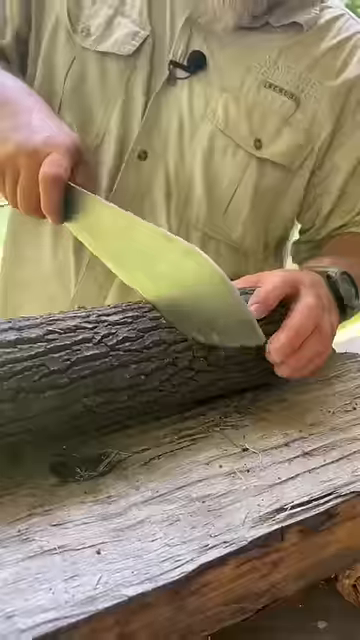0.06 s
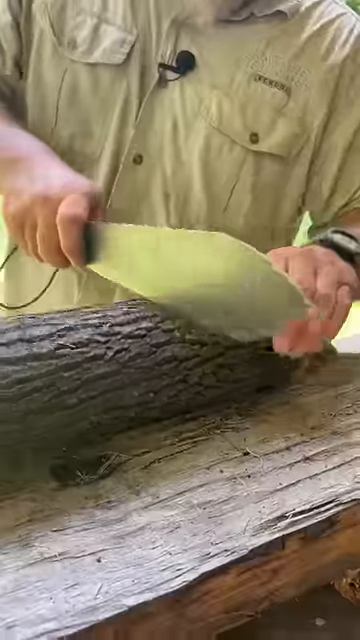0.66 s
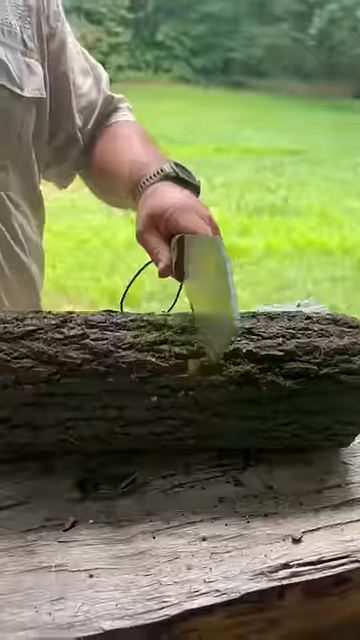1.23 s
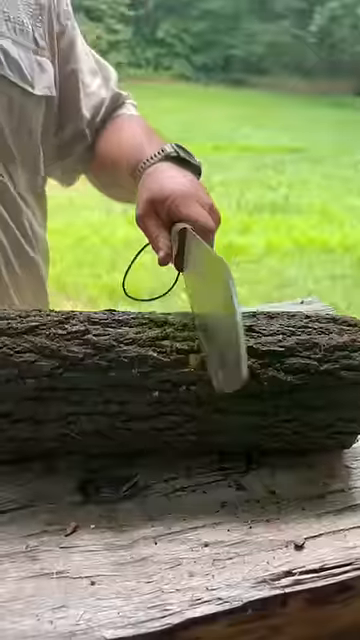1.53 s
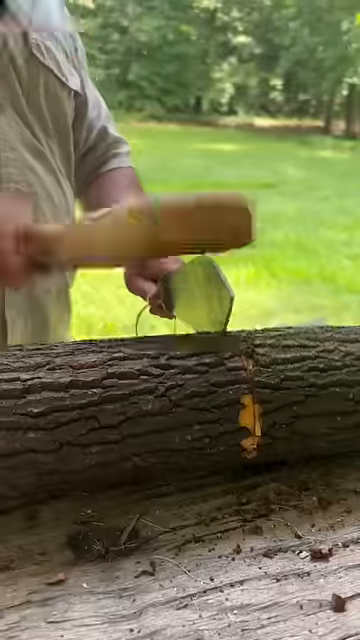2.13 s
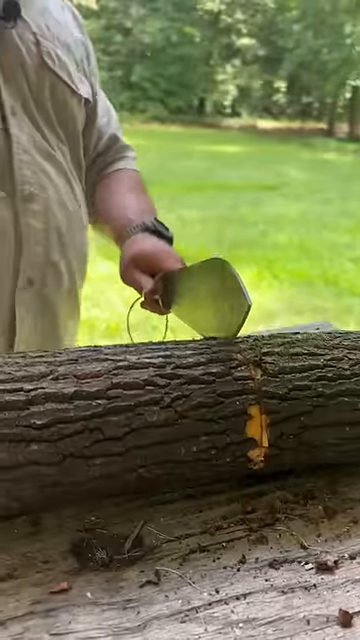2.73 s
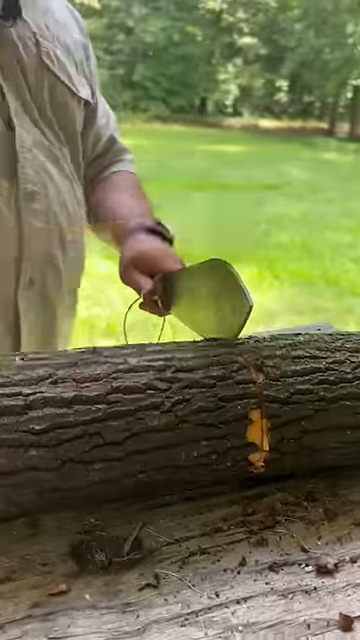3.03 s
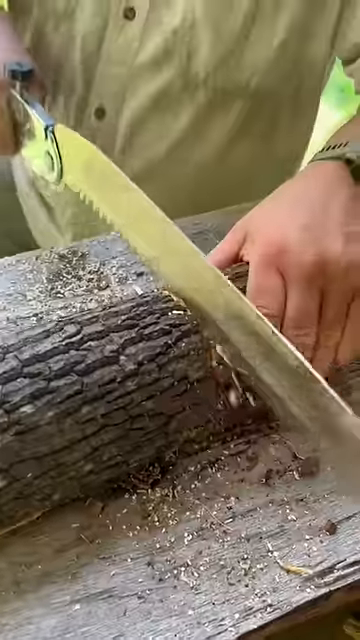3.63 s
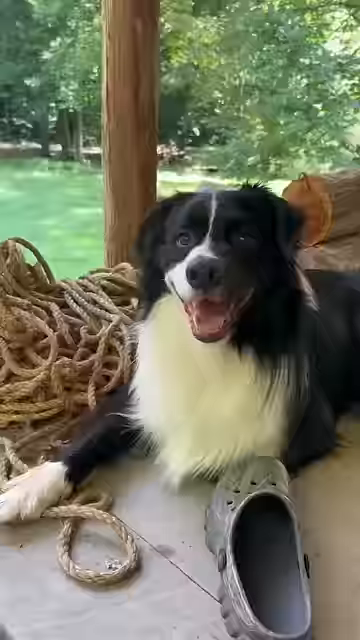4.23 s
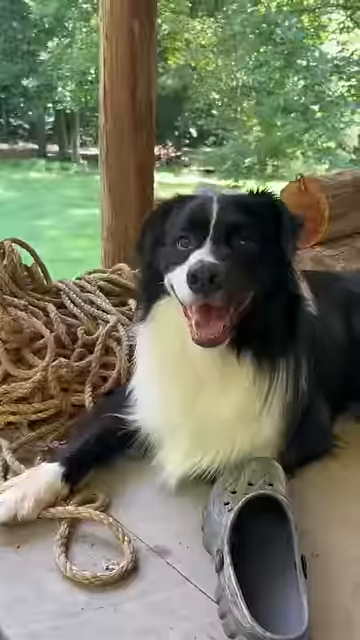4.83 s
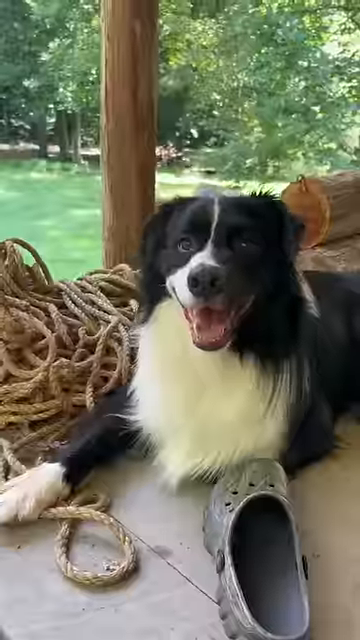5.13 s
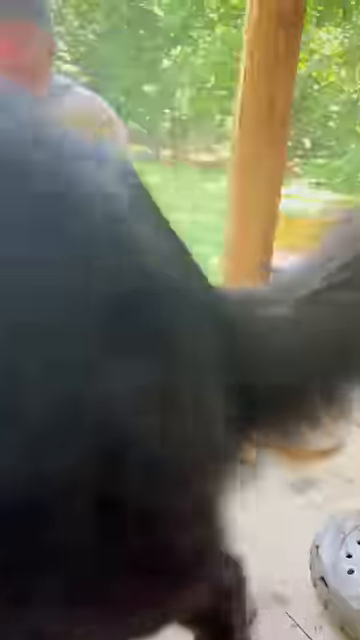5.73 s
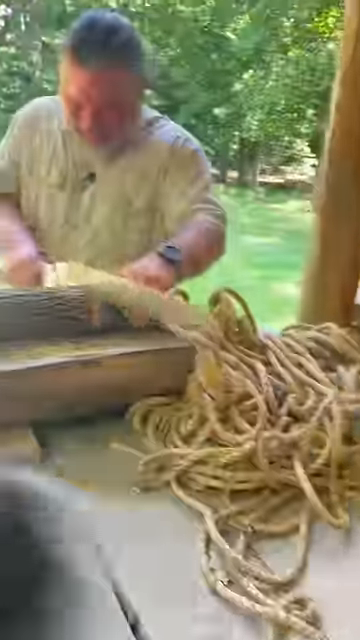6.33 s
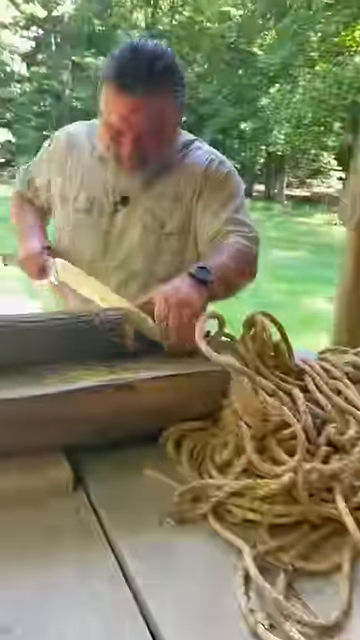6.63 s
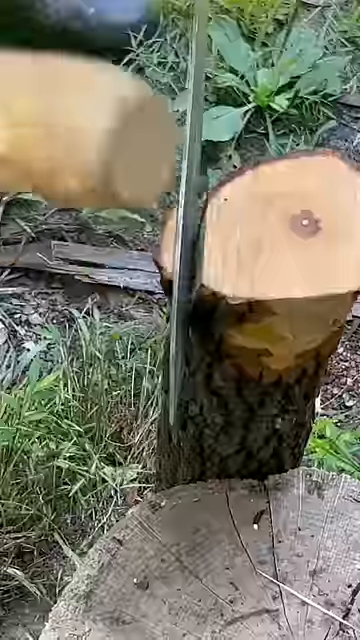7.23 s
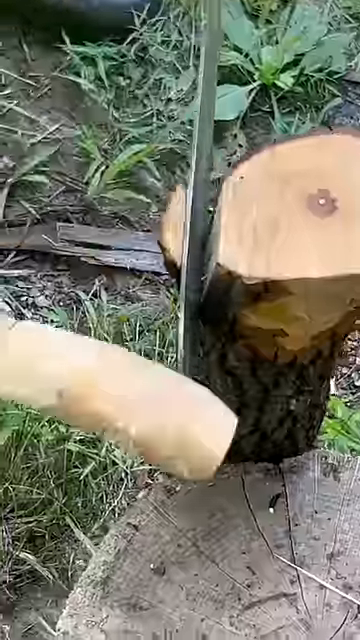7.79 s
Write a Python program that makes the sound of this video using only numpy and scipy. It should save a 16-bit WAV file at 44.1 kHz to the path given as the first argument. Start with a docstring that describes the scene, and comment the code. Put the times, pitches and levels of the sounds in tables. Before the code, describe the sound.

Quiet outdoor air with a very faint insect shrill lies under everything. In the first second a knife edge whispers lightly over bark and the log rocks with soft, dull bumps. From 1.4 to 3.2 seconds a wooden baton strikes the blade six times, about three a second, growing louder: sharp cracks with a brief steel ring, a low bench thump and a short echo. The loudest slightly overload the close microphone. From 3.2 seconds a toothed blade saws the log in much quieter, uneven rasping strokes with small squeaks and occasional dull knocks. The sawing eases around 5 seconds, then grows stronger from 5.5, the teeth catching and chattering near 6, 6.5 and 7 seconds while the bench rumbles. It cuts off at 7.2 seconds. Two more loud, drier baton blows crack against the blade at 7.4 and 7.8 seconds.

```python
"""Knife work on a log, on a wooden porch bench by a lawn. Over quiet air and faint insects, the edge
whispers across the bark and the log rocks. From 1.4 s a wooden baton drives the blade in with six knocks.
From 3.2 s the toothed spine saws across the log, catching and chattering. At 7.4 s come two last blows,
splitting an upright log out on the ground. The loudest blows overload the close microphone."""
import sys
import numpy as np
from scipy import signal
from scipy.fft import rfft, irfft, next_fast_len
from scipy.io import wavfile
from scipy.ndimage import map_coordinates

SR = 44100
rng = np.random.default_rng(int(sys.argv[2]) if len(sys.argv) > 2 else 0)


def output_pcm(signal):
    """Save a mono or channel-first signal as 16-bit PCM at the path in sys.argv[1].

    Samples are clipped to [-1, 1] before scaling.
    """
    pcm = np.clip(np.atleast_2d(signal).T, -1, 1) * 32767
    wavfile.write(sys.argv[1], SR, np.round(pcm).astype(np.int16))


N = 355446
TIME = np.arange(N) / SR
RING = TIME[:SR]  # one second for a hit to ring out


def undb(db):
    """Decibels to gain."""
    return 10 ** (np.asarray(db) / 20)


def unit(x):
    """Scale to rms 1."""
    return x / np.sqrt(np.mean(x ** 2))


def fade(t60):
    """One second of exponential decay."""
    return np.exp(-np.log(1000) * RING / t60)


def add(out, s, x):
    """Mix x in at time s."""
    i = int(s * SR)
    out[i:i + len(x)] += x[:len(out) - i]


def colour(x, curve, peaks=()):
    """EQ x with a smooth curve and resonant peaks on top; rms 1."""
    size = next_fast_len(len(x))
    hz = np.arange(size // 2 + 1) * SR / size
    curve_hz, curve_db = np.transpose(curve)
    db = np.interp(np.log(hz + 1), np.log(curve_hz), curve_db)
    for centre, width, lift in peaks:
        db = db + lift / (1 + (2 * (hz - centre) / width) ** 2)
    return unit(irfft(rfft(x, size) * undb(db), size)[:len(x)])


def noise(curve, size=SR):
    """Coloured noise of rms 1."""
    return colour(rng.standard_normal(size), curve)


def grains(rate, spread_db=2):
    """Random clicks of uneven size."""
    clicks = (rng.random(N) < rate / SR) * rng.standard_normal(N)
    return clicks * undb(spread_db * rng.standard_normal(N))


def walk(rate):
    """Slow random modulation of rms 1."""
    knots = np.arange(0, N / SR + 1, 1 / rate)
    return unit(np.interp(TIME, knots, rng.standard_normal(len(knots))))


def swing(start, length, fastest):
    """One hand stroke: its samples and its speed, from rest up to 1 and back."""
    now = slice(int(start * SR), int((start + length) * SR))
    turn = np.interp(TIME[now], [start, start + length * fastest, start + length], [0, .5, 1])
    return now, np.sin(np.pi * turn)


# EQ of the outdoor bed: f/Hz, level/dB
AIR_EQ = [(15, -41.5), (25, -4), (153, -12.5), (190, -11), (335, -15.5), (988, -20.5), (1070, -17),
          (1190, -21), (1890, -24.5), (5730, -33.5), (8140, -38.5), (16000, -41.5)]

def air():
    """A quiet bed of outdoor air, gently wavering."""
    return undb(-65.5 + 1.1 * walk(5)) * noise(AIR_EQ, size=N)


def insects(hz=8250):
    """A faint, narrow shrill from the trees."""
    return undb(-87 + 1.5 * walk(6)) * noise([(hz * .85, -50), (hz, 0), (hz * 1.15, -50)], size=N)


# EQ of steel on bark: f/Hz, level/dB
BARK_EQ = [(1470, -39), (2500, -9), (3300, -16), (4050, -1.5), (4580, -10), (5970, -6), (8870, -17),
           (13000, -19), (16000, -24)]
# EQ of a sharp attack, for knife ticks and baton cracks: f/Hz, level/dB
CRACK_EQ = [(60, -2), (400, -2), (1500, 0), (2800, 1), (3800, -14), (6000, -10.5), (10000, -18.5),
            (16000, -32)]
# light passes of the edge: t/s, length/s, fastest point/share of length, level/dB
EDGE_SLIDES = [(0.158, .29, 0.79, -62.5), (0.533, 0.3, 0.87, -66), (.94, 0.17, 0.84, -70)]
# ticks of the edge on a bark ridge and of the knife being handled: t/s, level/dB
KNIFE_TICKS = [(.415, -51.5), (1.973, -55), (1.99, -58.5)]

def edge():
    """The edge whispers over bark, louder with speed, and ticks on a ridge; the knife ticks as it is handled."""
    out = np.zeros(N)
    whisper = colour(grains(rate=9000), BARK_EQ)
    for start, length, fastest, db in EDGE_SLIDES:
        now, speed = swing(start, length, fastest)
        out[now] += undb(db) * speed ** .93 * whisper[now]
    for s, db in KNIFE_TICKS:
        add(out, s, undb(db) * noise(CRACK_EQ) * fade(t60=.053))
    return out


# knocks of the log: t/s, level/dB, f/Hz, t60/s
LOG_BUMPS = [(0.333, -52, 386, 0.14), (0.486, -52.5, 497, 0.16), (0.532, -44.5, 385, 0.19),
             (4.042, -40.5, 650, 0.13), (4.785, -41, 880, 0.64), (5.461, -62.5, 131, 0.11),
             (6.355, -37.5, 570, 0.12), (6.951, -29, 700, 0.05), (6.964, -37.5, 464, 0.21)]

def log_bumps():
    """The log rocks against the bench with dull knocks."""
    out = np.zeros(N)
    for s, db, hz, t60 in LOG_BUMPS:
        knock = noise([(40, -20), (130, -5), (hz / 2.7, -7), (hz, 0), (hz * 1.5, -14),
                       (4000, -38), (16000, -60)])
        add(out, s, undb(db) * knock * fade(t60))
    return out


def ring(modes, pitch, jitter):
    """Struck modes die away, slightly detuned at every blow."""
    out = np.zeros(SR)
    for k, (hz, db, t60) in enumerate(modes):
        detuned_hz = hz * pitch * (1 + jitter * rng.standard_normal())
        out += (-1) ** k * undb(db) * fade(t60) * np.sin(2 * np.pi * detuned_hz * RING)
    return out


# hard stops for the tails of the blows; the last also ends the sawing: t/s
STOPS = [1.96, 3.2715, 7.212]

def gated(x, s):
    """A sound starting at time s stops dead at the next hard stop."""
    stop = min([t for t in STOPS if t > s] + [N / SR])
    return x[:int((stop - s) * SR)]


# blade, baton and log ringing together in each seat: f/Hz, level/dB, t60/s
BITING_MODES = [(560, -21, 0.23), (1263, -17.5, 0.15), (2101, 1, 0.04), (2499, -3, 0.07), (2573, -7, .065),
                (2720, -8.5, 0.043), (3350, -31.5, 0.084), (4500, -20, 0.078), (8900, -49, .28)]  # seat 0: edge just biting
WEDGED_MODES = [(595, -17, 0.16), (762, -26, 0.16), (1106, -13.5, 0.074), (1331, -11.5, 0.063),
                (1383, -18, 0.091), (1738, -9.5, 0.046), (1870, 0.5, 0.037), (2118, -10.5, 0.062),
                (2575, -9.5, 0.054), (3295, -22, 0.088), (5470, -20.5, 0.013), (7220, -27, 0.052)]  # seat 1: wedged deep
UPRIGHT_MODES = [(375, -14, 0.058), (473, -13.5, 0.059), (1089, -4, 0.028), (1470, -9.5, 0.026),
                 (1687, -10.5, 0.064), (1850, -8, 0.026), (2460, 0.5, 0.027), (3170, -9.5, 0.031),
                 (4086, -14, 0.045), (5060, -17, 0.046)]  # seat 2: upright log
# low thump of the bench: f/Hz, level/dB, t60/s
BENCH_MODES = [(36, -35, 0.29), (58.3, -39, 0.45), (94.8, -23.5, 0.37), (112, -14, 0.0099),
               (112.6, -20.5, .28), (126, -31, 0.32), (233, -27.5, 0.24), (327, -37, 0.25)]
# reverb EQ of porch, yard and far trees: f/Hz, level/dB
PORCH_EQ = [(50, -10.5), (110, -2), (200, -1.5), (380, 0), (620, 3.5), (900, 0), (1400, 3), (2000, -0.5),
            (2700, -9), (3800, -19.5), (7000, -34.5), (16000, -42)]
YARD_EQ = [(50, -21.5), (220, -19), (390, -1), (750, 0), (1100, -0.5), (1800, 1), (2700, -9), (3800, -17),
           (5300, -15.5), (9000, -28), (16000, -46.5)]
FAR_EQ = [(50, 13), (110, 9), (220, 2), (450, -5.5), (1200, -8), (1550, 1), (1900, -1), (2300, -4.5),
          (2600, -5.5), (2900, -12), (3600, -17.5), (5200, -18.5), (9000, -29.5), (16000, -45.5)]
# space around each seat: scatter send/dB, scatter t60/s, far send/dB, thump trim/dB
SEAT_SPACES = [(-11.5, 0.17, -45, 2.5), (-10, 0.16, -41.5, 4), (-18.5, 0.16, -49, -22.5)]
# baton hits: t/s, level/dB, pitch/ratio, crack trim/dB, thump level/dB, seat
BATON_BLOWS = [(1.3741, -3.5, 1, 8, -4, 0), (1.6912, 0.5, 1, 7, 0, 0), (2.1483, 1.5, 0.97, 7.5, -2.5, 1),
               (2.497, 3.5, 1.003, 3.5, 0.5, 1), (2.8596, 4.5, 1, 3.5, 3, 1),
               (3.2118, 4.5, 1.01, 3.5, 3.5, 1), (3.2516, -13.5, .95, -9.5, -25, 0),
               (7.4088, -1, 1.02, 5, -7.5, 2), (7.756, -0.5, 1.013, 6, 0.5, 2)]

def baton(crack_db=-8, far_t60=.9, build_s=.0035):
    """Each blow cracks, rings the blade and thumps the bench; near boards and far trees echo it."""
    out = np.zeros(N)
    seat_modes = [BITING_MODES, WEDGED_MODES, UPRIGHT_MODES]
    seat_eqs = [PORCH_EQ, PORCH_EQ, YARD_EQ]
    echoes = [noise(eq) for eq in seat_eqs]
    build = 1 - np.exp(-RING / build_s)
    for s, db, pitch, crack_trim, thump_db, seat in BATON_BLOWS:
        scatter_db, scatter_t60, far_db, thump_trim = SEAT_SPACES[seat]
        blade = ring(seat_modes[seat], pitch, jitter=.003)
        crack = undb(crack_db + crack_trim) * noise(CRACK_EQ) * fade(t60=.029)
        thump = undb(thump_db + thump_trim) * ring(BENCH_MODES, 1, jitter=.14)
        # blows in one seat share most of their echo pattern
        pattern = unit(echoes[seat] + .66 * noise(seat_eqs[seat]))
        scatter = undb(scatter_db) * pattern * fade(scatter_t60)
        # the far tail blends noise with the blade's own notes
        notes = unit(signal.fftconvolve(blade, rng.standard_normal(SR))[:SR])
        far = undb(far_db) * unit(noise(FAR_EQ) + .8 * notes) * fade(far_t60)
        blow = undb(db) * (blade + crack + build * (scatter + far)) + thump
        add(out, s, gated(blow, s))
    # a faint far tail hangs in the air as the sawing stops
    add(out, STOPS[-1], undb(-61) * noise(FAR_EQ) * fade(far_t60))
    return out


def overtones(x, count=90):
    """The blade's many narrow high peaks and notches, set by where the wood grips it."""
    modes = [(3500 + 11000 * (k + place) / count, 60, 16 * (size - .47))
             for k, (place, size) in enumerate(rng.random((count, 2)))]
    return colour(x, [(1, 0)], modes)


# resonances of the sawing blade: f/Hz, width/Hz, lift/dB
BLADE_PEAKS = [(610, 70, 4), (980, 90, 3), (1780, 140, 5), (2070, 190, 6), (2460, 120, 6)]

def pinched(x, curve, notes, free):
    """Colour x by the blade; the stroke's notes come and go with how freely it can ring."""
    return free * colour(x, curve, BLADE_PEAKS + notes) + (1 - free) * colour(x, curve, BLADE_PEAKS)


def glide(x, depth):
    """Every resonance drifts in pitch as the blade travels through the cut."""
    place = np.cumsum(1 + depth * walk(14)[:len(x)])
    return map_coordinates(x, [place], order=5, mode="mirror")


# EQ of tooth rasp, wood body and bench rumble: f/Hz, level/dB
RASP_EQ = [(1500, -57), (2600, -9), (2950, -7), (3500, -5), (3950, -1.5), (4600, -0.5), (5700, -5.5),
           (7400, -8), (9300, -9.5), (12400, -14), (15300, -13), (16000, -50)]
WOOD_EQ = [(200, -5.5), (350, -5), (600, 1), (850, -2.5), (1250, -2), (1430, -7), (1650, -1.5),
           (2000, -1.5), (2700, -6), (3600, -20)]
RUMBLE_EQ = [(15, -42), (25, -6), (43, -1), (103, 6), (120, 2.5), (178, -8.5), (244, -10), (278, -14.5),
             (330, -13), (430, -16), (730, -120)]
# saw strokes, each with its own free length of blade and so its own notes:
# t/s, length/s, fastest point/share of length, rasp level/dB, wood level/dB, rumble level/dB,
# flex f/Hz, flex lift/dB, sing f/Hz, sing lift/dB, squeak lift/dB
SAW_STROKES = [(3.209, 0.3, 0.59, -40, -44, -41, 1100, 12, 3270, 8, -1),
               (3.499, 0.22, 0.49, -43, -47.5, -45, 1140, 9.5, 2230, 2, 2),
               (3.694, 0.26, 0.55, -38.5, -42, -41.5, 1123, 23, 3300, 0, -8),
               (3.989, 0.22, 0.29, -44.5, -48, -50, 1090, 14, 3230, 18, 5),
               (4.177, 0.17, 0.55, -49.5, -49.5, -44.5, 1120, 17, 3300, 13.5, -1),
               (4.343, 0.22, 0.6, -42.5, -43, -48, 996, 14, 3350, 10, 7),
               (4.54, .432, 0.51, -44.5, -44.5, -43, 800, -4, 3300, 6, 1),
               (4.866, .312, 0.43, -47.5, -49.5, -53.5, 810, 5, 3260, 21, -23),
               (5.13, 0.14, 0.36, -76, -62, -68, 1150, 4.5, 2070, 16, 3),
               (5.273, .13, 0.7, -47, -53.5, -60, 1180, 8, 3190, 29, 0),
               (5.539, 0.25, 0.61, -36, -39.5, -44, 1165, 17.5, 3300, 18, 5),
               (5.758, .377, 0.65, -38, -40, -38, 1160, 21.5, 3230, 5, 8),
               (6.122, 0.24, 0.58, -41.5, -43.5, -41, 1110, 15, 3330, 8, 3),
               (6.356, 0.31, 0.55, -36, -39.5, -31, 1170, 15, 3300, 9, 1),
               (6.658, 0.26, 0.59, -40, -42.5, -40, 1175, 17.5, 3220, 15, 5.5),
               (6.898, 0.37, 0.43, -37, -39, -30.5, 1170, 12, 3230, 14, 0)]

def saw(rasp_trim_db=1, rumble_trim_db=1.5, squeak_hz=4230, lead_s=.038, hang_s=.072):
    """Teeth tear fibres in a juddering stream of clicks that rings blade and wood and shakes the bench."""
    out = np.zeros(N)
    snags, shake, bite = catches()
    free = .75 + .35 * np.tanh(walk(16))  # the cut pinches and lets go
    judder = undb(1.78 * walk(110) + .8 * walk(45))
    teeth = grains(rate=12000) * judder
    fibres = grains(rate=8000) * judder
    bench = colour(teeth, RUMBLE_EQ, [(102, 22, 1.6)])
    for (start, length, fastest, rasp_db, wood_db, rumble_db,
         flex_hz, flex_db, sing_hz, sing_db, squeak_db) in SAW_STROKES:
        now, speed = swing(start, length, fastest)
        rasp_gain = undb(rasp_db + rasp_trim_db) * speed ** 1.76 * bite[now]
        wood_gain = undb(wood_db) * speed ** 1.3 * np.sqrt(bite[now])
        notes = [(flex_hz, 130, flex_db), (sing_hz, 170, sing_db), (squeak_hz, 220, squeak_db)]
        steel = overtones(teeth[now])
        rasp = glide(pinched(steel, RASP_EQ, notes, free[now]), depth=.009)
        wood = glide(pinched(fibres[now], WOOD_EQ, notes, free[now]), depth=.025)
        # a caught tooth plucks the blade into a squeak
        pluck = colour(steel, RASP_EQ, [(squeak_hz, 500, 6)])
        out[now] += rasp * rasp_gain + pluck * snags[now]
        out[now] += wood * np.hypot(wood_gain, undb(-4) * snags[now])
        # the bench stirs as the hand leans in and rumbles on after the stroke
        now, push = swing(start - lead_s, lead_s + length + hang_s, fastest)
        out[now] += bench[now] * undb(rumble_db + rumble_trim_db) * push ** 2.9
    return (out + undb(-12) * shake) * (TIME < STOPS[-1])


# single snags and chattering runs: t/s, level/dB, count, gap/s, length of each/s
TOOTH_CATCHES = [(3.492, -50, 1, 0, .006), (3.769, -42.5, 1, 0, .006), (4.007, -49.5, 1, 0, .012),
                 (4.265, -40, 1, 0, .016), (4.78, -35.5, 1, 0, .008), (4.823, -32.5, 1, 0, .012),
                 (5.294, -46, 1, 0, .024), (5.949, -33, 3, .033, .007), (6.458, -27, 5, .0287, .012),
                 (6.948, -33, 3, .0305, .006), (7.036, -28, 4, .041, .01)]

def catches(crest=.4, fall_db=7.5, shake_hz=98, skip_s=.032, duck_db=-7):
    """Teeth snag, jolt the bench, then skip: the snag envelope, the shake and a gain to duck the saw."""
    snags, shake, skipping = np.zeros((3, N))
    attack = 1 - np.exp(-RING / .001)
    for start, db, count, gap, length in TOOTH_CATCHES:
        for k in range(count):
            s = start + k * gap
            # a run swells to its crest and dies away
            off_crest = (k / (count - 1) - crest) / (1 - crest) if count > 1 else 0
            gain = undb(db - fall_db * abs(off_crest))
            add(snags, s, gain * attack * np.exp(-(RING / length) ** 4))
            add(shake, s, gain * fade(t60=.089) * np.sin(2 * np.pi * shake_hz * RING))
            add(skipping, s, np.exp(-(RING / skip_s) ** 4))
    return snags, shake, undb(duck_db * np.minimum(skipping, 1))


def scene():
    """The knife work over the outdoor bed, in mono."""
    return (air() + insects() + edge() + log_bumps() + baton() + saw())[None]


def record(dry, ceiling=.8, top_hz=16000):
    """The microphone soft-clips the loudest peaks; a steep low-pass trims the top."""
    rounded = dry / (1 + (dry / ceiling) ** 4) ** (1 / 4)
    return signal.sosfilt(signal.ellip(8, .2, 70, top_hz, fs=SR, output="sos"), rounded)


dry = scene()
out = record(dry)
output_pcm(out)
```